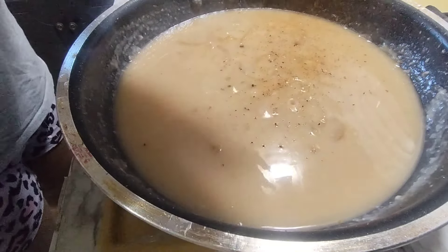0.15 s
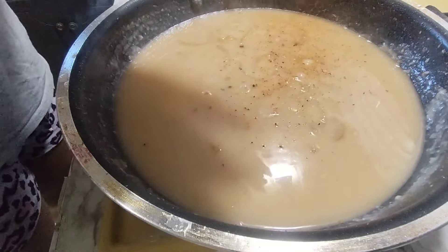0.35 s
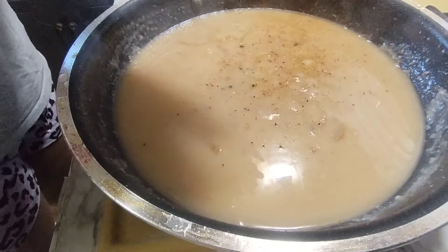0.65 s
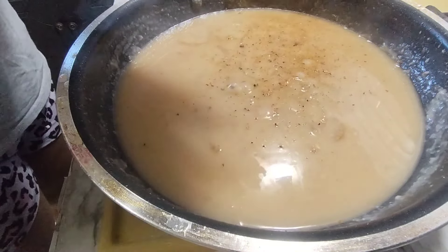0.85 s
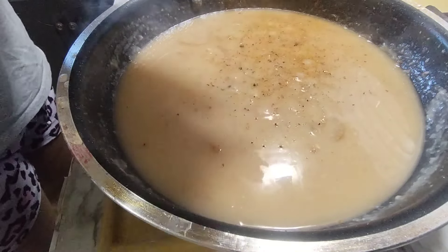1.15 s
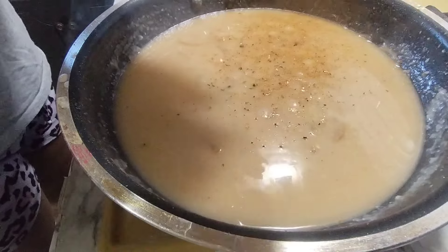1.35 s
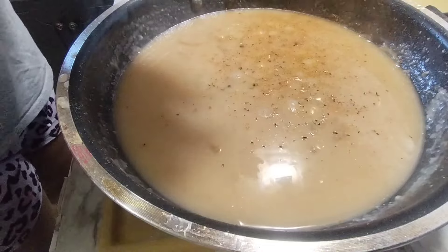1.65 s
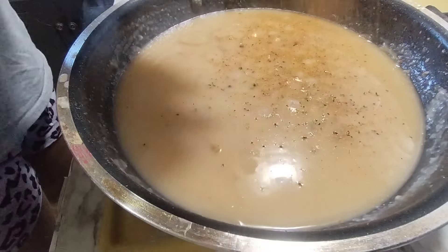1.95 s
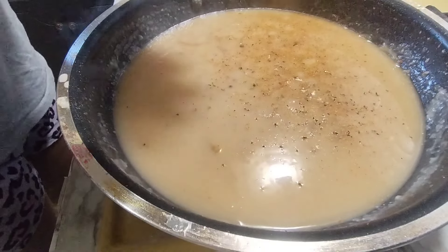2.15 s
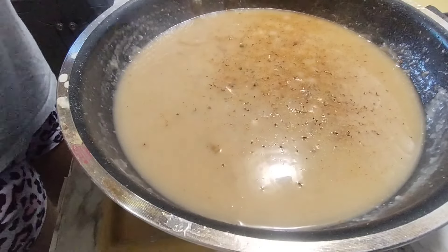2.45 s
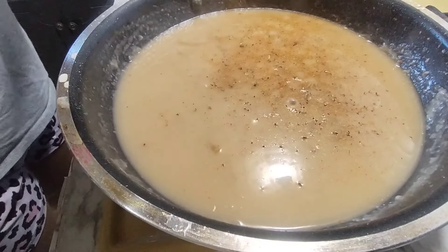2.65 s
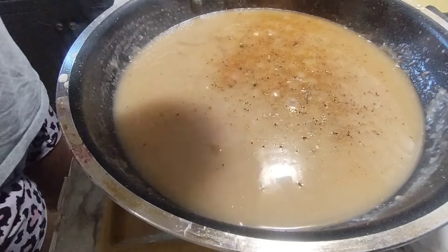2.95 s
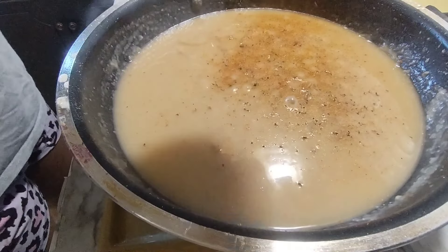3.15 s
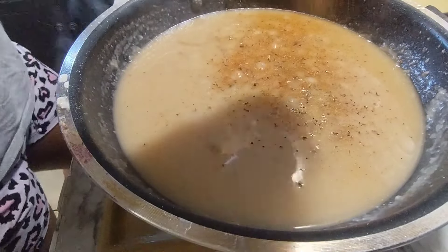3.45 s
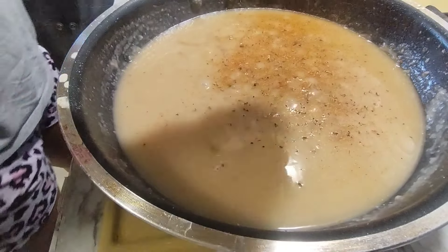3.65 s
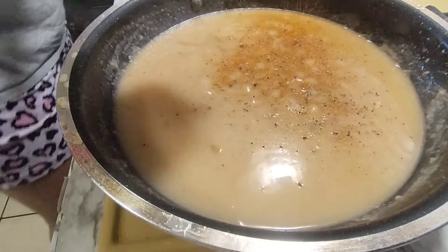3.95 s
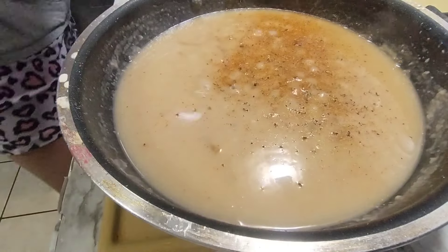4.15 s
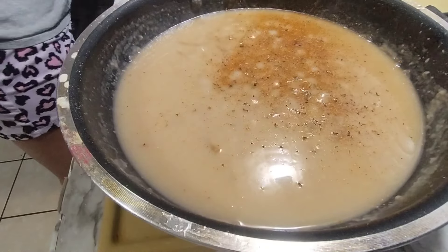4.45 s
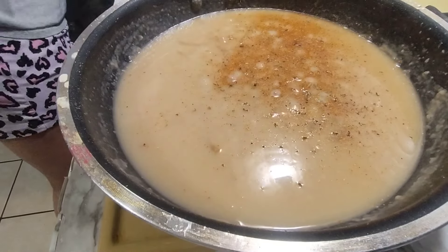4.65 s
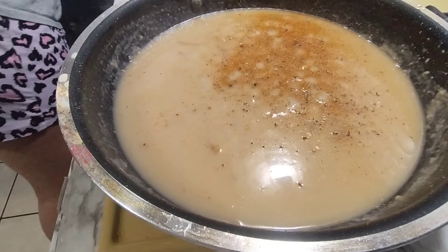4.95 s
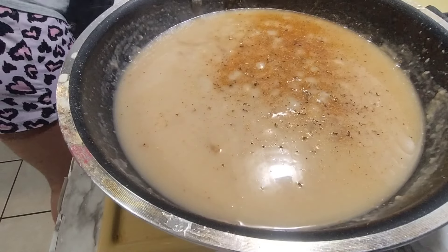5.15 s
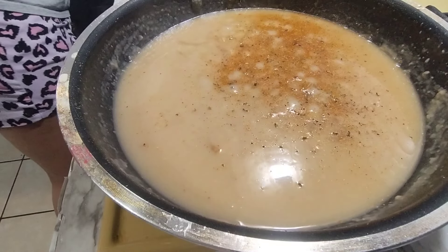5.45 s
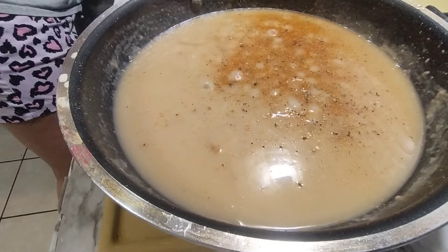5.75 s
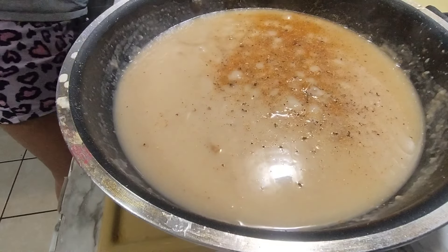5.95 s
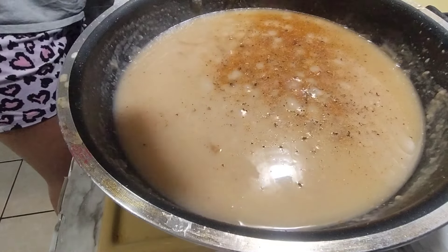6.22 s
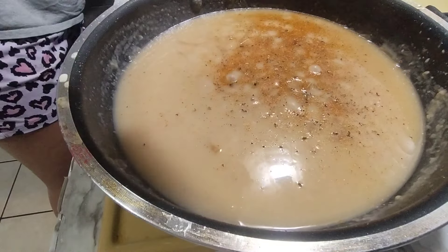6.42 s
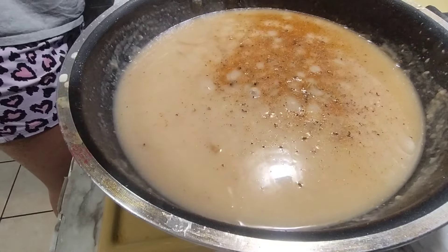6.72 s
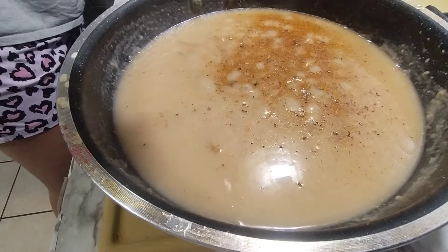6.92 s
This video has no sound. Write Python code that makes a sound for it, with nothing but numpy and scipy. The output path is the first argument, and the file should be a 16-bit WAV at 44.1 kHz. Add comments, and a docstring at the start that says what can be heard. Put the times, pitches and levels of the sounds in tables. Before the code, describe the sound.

A quiet kitchen with a faint low fridge hum and soft room noise, heard close in stereo, the left side brighter. From 0 to about 3.7 seconds a spice shaker is shaken steadily, nearly five strokes a second: dry, bright grains swish up, slap the cap in a crisp burst, then pour back. Strokes are strongest around 1.4 to 2 seconds, and the slaps weaken after 3.2. Little clicks stray among them. Grains trickle softly from 3.8 to 4.3. At 4.35 the bottle hits the worktop with a loud, hard, short-ringing knock, with a weaker rocking tap at 4.44. Around 5.0 to 5.2 there are small scuffs and soft bumps; a stronger low, dull shudder comes at 5.35, another at 5.8, fainter ones near 6.1. Tiny cap ticks scatter throughout, clustering at 6.6 to 6.7. Grains rustle faintly at 6.4, then a brief bright rattle at 6.95 as another shaker is lifted.

```python
"""Spice shaker in a hard kitchen

Shaker strokes: grain noise swells as the grains slide, bursts as they slam into the cap, then pours back.
Later the bottle is knocked down on the worktop (noise cracks, ringing modes), the stand is bumped (sines,
grit), something scuffs (banded grit), caps tick (noise bursts) and another shaker is lifted. A fridge hums
(sines, narrow noise) under coloured room noise. The two microphone ports differ, the left one bright."""
import sys
import numpy as np
from scipy import signal
from scipy.fft import rfft, irfft
from scipy.io import wavfile
from scipy.ndimage import uniform_filter1d

SR = 44100
rng = np.random.default_rng(int(sys.argv[2]) if len(sys.argv) > 2 else 0)


def digitize_waveform(pressure):
    """Quantize a signal to 16-bit integers and store it at the path in sys.argv[1].

    Rows of a 2-D input are taken as channels; values are limited to [-1, 1].
    """
    field = np.atleast_2d(pressure).T
    bounded = np.clip(field, -1, 1)
    quanta = np.round(bounded * 32767).astype(np.int16)
    wavfile.write(sys.argv[1], SR, quanta)


N = 312228
T = np.arange(N) / SR   # s
TICK_LEAN_DB = 4   # left over right, small sounds
# correlation of diffuse sound at the two ports: [hz, likeness_0_to_1]
PORT_LIKENESS = [(60, 1), (230, 0.6), (920, 0.11), (3600, 0.02), (14100, 0.11)]


def from_db(db):
    """Decibels to gain."""
    return 10 ** (np.asarray(db) / 20)


def rms_one(x):
    """Scale the mean of the channels to rms 1."""
    mono = np.mean(np.atleast_2d(x), axis=0)
    return x / np.sqrt(np.mean(mono ** 2) + 1e-20)


def filtered(x, order, hz, kind="low"):
    """Butterworth filter."""
    return signal.sosfilt(signal.butter(order, hz, kind, fs=SR, output="sos"), x)


def lean(db):
    """Gains that set left over right by db."""
    return from_db([[db / 2], [-db / 2]])


def at_hz(points, hz):
    """Read a table on a log-frequency axis."""
    table_hz, values = np.transpose(points)
    return np.interp(np.log(hz), np.log(table_hz), values)


def colour(pair, spectra):
    """Give each port its own spectrum from rows (hz, left_db, right_db), then set the level to rms 1."""
    table_hz, *ports_db = np.transpose(spectra)
    log_hz = np.log(np.maximum(np.fft.rfftfreq(N, 1 / SR), 1))
    gains = from_db([np.interp(log_hz, np.log(table_hz), db) for db in ports_db])
    return rms_one(irfft(rfft(pair) * gains, N))


def stereo_noise():
    """White noise whose mid and side parts are weighted for the likeness of the ports at each frequency."""
    mid, side = rfft(rng.standard_normal((2, N)))
    hz = np.maximum(np.fft.rfftfreq(N, 1 / SR), 1)
    alike = np.clip(at_hz(PORT_LIKENESS, hz), -1, 1)
    return irfft(np.sqrt(1 + alike) * mid + np.sqrt(1 - alike) * side * [[1], [-1]], N)


def ring(clicks, hz, t60):
    """Two-pole resonator: a unit click sets a sine of about height 1 ringing."""
    radius = from_db(-60 / (t60 * SR))
    w = 2 * np.pi * hz / SR
    return signal.lfilter([0, np.sin(w)], [1, -2 * radius * np.cos(w), radius ** 2], clicks + 1e-18)


def grains(per_s, spread_db):
    """Tiny random collisions of uneven size, other ones at each port."""
    sizes = from_db(spread_db * np.minimum(rng.exponential(1, (2, N)), 5))
    signs = rng.choice([-1, 1], (2, N))
    return sizes * signs * (rng.random((2, N)) < per_s / SR)


def background():
    """Coloured room noise, and fridge hum lines as steady sines plus wavering narrow-band noise."""
    # room noise, left against right: [hz, left_over_right_db]
    air_lean = [(60, 0.5), (160, 0), (300, 2.5), (600, 4), (5400, -4), (7400, 6), (10000, 11), (14100, -18)]
    # room noise spectrum, relative: [hz, level_db_per_hz]
    air = [(25, -20), (108, 1.5), (166, -14.5), (234, 4), (290, -8), (331, -3.5), (432, -8), (534, -12),
           (800, -15.5), (2000, -16.5), (7000, -18.5), (9000, -18.5), (11000, -25.5), (14500, -38)]
    # fridge hum: [centre_hz, width_at_half_amplitude_hz, wavering_db, steady_db, left_over_right_db]
    hum = [(121, 1.5, -80.5, -76, -3), (214.7, 15, -81.5, -105, 10), (242.4, 5.9, -77, -90, 5.5),
           (335.4, 6.1, -89, -77.5, 11.5), (434.7, 57, -75, -100, -1)]
    air_db = -68
    leaning = colour(stereo_noise(), [(f, db / 2, -db / 2) for f, db in air_lean])
    out = from_db(air_db) * colour(leaning, [(f, db, db) for f, db in air])
    hz = np.fft.rfftfreq(N, 1 / SR)
    for centre_hz, width_hz, wavering_db, steady_db, lean_db in hum:
        resonance = 1 / (1 + ((hz - centre_hz) / width_hz * 2) ** 2)
        wavering = rms_one(irfft(rfft(rng.standard_normal(N)) * resonance, N))
        steady = np.sqrt(2) * np.sin(2 * np.pi * centre_hz * T)
        out = out + (from_db(wavering_db) * wavering + from_db(steady_db) * steady) * lean(lean_db)
    return out


def patchy(x, depth_db):
    """Split into bands whose levels wander separately, as grains bunch and scatter."""
    step = 20   # samples between points of the slow gain
    bands = 8   # 2/3 octave apart from 500 Hz
    hz, spectrum, out = np.fft.rfftfreq(N, 1 / SR), rfft(x), 0
    place = 1.5 * np.log2(np.clip(hz, 500, 12700) / 500)
    wander_band = signal.butter(2, [8, 70], "band", fs=SR / step, output="sos")
    wander = signal.sosfilt(wander_band, rng.standard_normal((bands, N // step + 1)))
    for k, slow in enumerate(wander):
        slow = np.interp(np.arange(N) / step, np.arange(len(slow)), rms_one(slow))
        band = irfft(spectrum * np.maximum(1 - abs(place - k), 0), N)
        out = out + from_db(depth_db * slow) * band
    return rms_one(out)


def shaker():
    """Sliding grains swell before each slam and pour back after it; the slam is a short dense burst."""
    # strokes: [slam_s, slam_db, slam_length_s, slide_db, swell_from_6_db_down_s, peak_ahead_of_slam_s,
    #           sag_after_peak_db_per_s, pour_back_db, pour_lasts_s, pour_fade_db_per_s]
    strokes = [(0.115, -45, 0.014, -52, .027, 0.03, 5, -55, 0.04, 140),
               (0.324, -51, 0.014, -53.5, 0.026, .038, 50, -54.5, .1, 44),
               (0.55, -44.5, .0095, -51.5, 0.022, 0.047, 36, -51, 0.082, 82),
               (0.775, -47.5, 0.0099, -53, 0.023, 0.049, 10, -51.5, .072, 77),
               (0.997, -47, 0.0094, -53, 0.018, 0.044, 10, -51, 0.07, 10),
               (1.208, -45, 0.0056, -50.5, 0.029, .034, 120, -46, 0.073, 128),
               (1.405, -39.5, 0.01, -48.5, 0.022, 0.046, 67, -48, 0.074, 36),
               (1.598, -42.5, 0.0095, -48, 0.023, 0.042, 33, -43.5, .072, 130),
               (1.786, -43.5, 0.019, -49.5, 0.025, 0.042, 40, -44, 0.059, 133),
               (1.977, -42, 0.011, -48.5, 0.031, 0.041, 180, -46.5, 0.059, 60),
               (2.181, -43.5, 0.018, -51, 0.023, 0.045, 10, -47, 0.079, 75),
               (2.406, -43.5, 0.0064, -49.5, 0.022, 0.053, 70, -45, 0.082, 78),
               (2.625, -45, 0.013, -49.5, 0.017, 0.051, 66, -49.5, 0.081, 17),
               (2.849, -46, 0.01, -50, 0.028, 0.043, 180, -50.5, 0.079, -1),
               (3.06, -47, 0.0092, -52.5, 0.028, 0.031, 120, -50, 0.07, 66),
               (3.278, -54, 0.0035, -50.5, 0.028, 0.033, 64, -46.5, 0.058, 127),
               (3.49, -56, .014, -49, 0.024, 0.042, 120, -46, 0.078, 123),
               (3.694, -57.5, 0.025, -57.5, .027, 0.036, 100, -50.5, 0.048, 130),
               (6.939, -58, 0.017, -60, 0.017, 0.053, 50, -52, 0.09, 34)]
    # grains tip over in a tilted shaker: [middle_s, level_db, half_length_to_6_db_down_s, dullness_db]
    tips = [(3.863, -62.5, 0.038, 5), (3.966, -56, 0.065, 0.5), (4.076, -59.5, 0.065, 9.5),
            (4.26, -59.5, 0.013, 4), (4.34, -63.5, 0.14, 8.5), (5.01, -67.5, 0.031, 10.5),
            (5.22, -66.5, 0.13, 6.5), (6.396, -60.5, 0.096, 4), (6.748, -62, 0.036, 2),
            (6.884, -62, 0.029, -7), (6.976, -47.5, 0.031, -5)]
    # sliding grains at each port, relative: [hz, left_db_per_hz, right_db_per_hz]
    slide_colour = [(300, -49, -41), (570, -20.5, -20), (1780, -19.5, -21.5), (2150, -16, -15.5),
                    (2710, -16.5, -17.5), (4600, -14.5, -14.5), (5700, -12.5, -12.5), (7140, -10, -12.5),
                    (8200, -1, -20), (9130, 1, -16), (10470, -5.5, -23), (11700, -10, -23),
                    (15600, -19, -23.5)]
    # slamming grains at each port, relative: [hz, left_db_per_hz, right_db_per_hz]
    slam_colour = [(100, -15, -15), (550, -17.5, -31), (1190, -23.5, -13), (2280, -12, -23),
                   (4260, -19, -12.5), (5400, -14, -14), (6880, -2, -6.5), (8100, 2, -14), (9500, 2.5, -12),
                   (10060, -0.5, -27), (11500, -8.5, -15), (15200, -19, -29)]
    # rustle between the regular strokes, then a faint one
    steady_shaking_ends_s, between_db, at_rest_db = 3.76, -64, -81
    slam_fall_db_per_s = 1048
    pour_fall_s = 0.013   # the pour loses a further 6 dB this long after it ends
    body_follows, full_flow_db = 0.57, -49   # lower rustle swings less than the bright, around full flow
    slam_lag_s, slam_blur_s = 0.002, 0.0045   # the far port hears the slam later and less sharply

    shaking = T < steady_shaking_ends_s
    slide_power = from_db(2 * np.where(shaking, between_db, at_rest_db))
    slam = np.zeros(N)
    for at, slam_db, length, slide_db, swell_s, lead, sag, back_db, lasts, fade in strokes:
        near = slice(max(round((at - .25) * SR), 0), round((at + .3) * SR))
        t = T[near] - at
        rise = np.clip(t / 0.0052 + .5, 0, 1)   # crossover from slide to pour
        swell = 6 * (np.maximum(-lead - t, 0) / swell_s) ** 2
        before_db = slide_db - swell - sag * np.maximum(t + lead, 0)
        after_db = back_db - fade * t - 6 * (np.maximum(t - lasts, 0) / pour_fall_s) ** 2
        slide_power[near] += (1 - rise ** 2) * from_db(2 * before_db)
        slide_power[near] += rise ** 2 * from_db(2 * after_db)
        slam[near] += rise ** 2 * from_db(slam_db - slam_fall_db_per_s * np.maximum(t - length, 0))

    compressed = slide_power ** body_follows * from_db(2 * full_flow_db * (1 - body_follows))
    body_power = np.where(shaking, compressed, slide_power)
    for at, db, half, dull_db in tips:
        near = slice(round((at - .4) * SR), round((at + .4) * SR))
        swell = from_db(2 * (db - 6 * ((T[near] - at) / half) ** 2))
        slide_power[near] += swell
        body_power[near] += swell * from_db(2 * dull_db)

    rustle = patchy(colour(grains(per_s=8000, spread_db=1.6), slide_colour), depth_db=1.65)
    body = filtered(rustle, 2, 5500)
    sliding = np.sqrt(slide_power) * (rustle - body) + np.sqrt(body_power) * body
    blurred = uniform_filter1d(slam, max(round(slam_blur_s * SR), 1))
    far = np.interp(T - slam_lag_s, T, blurred)
    burst = colour(grains(per_s=17000, spread_db=1.0), slam_colour)
    return sliding + np.array([slam, far]) * burst


def strays():
    """Sparse clicks of single loose grains, each ringing a few cycles at its own pitch, at both ports."""
    per_s, level_db = 82, -81.5
    clicks = grains(per_s=per_s, spread_db=3.0)[0]
    pitches_hz = np.geomspace(3200, 9000, 8)
    dealt = rng.integers(0, len(pitches_hz), N)
    rings = sum(ring(clicks * (dealt == k), hz, 11.0 / hz) for k, hz in enumerate(pitches_hz))
    return from_db(level_db) * rms_one(rings) * lean(TICK_LEAN_DB)


def kitchen(x):
    """Reflections: noise that dies band by band, unlike at the two ports except in the bass."""
    # reverberation time: [hz, t60_s]
    decay = [(100, 0.49), (600, 0.46), (3000, 0.41), (9000, 0.18), (14000, 0.26)]
    t = np.arange(SR * 3 // 4) / SR
    white = rng.standard_normal((2, 2, len(t)))   # neighbouring bands get unrelated noise
    tail = 0
    for k, low_hz in enumerate(45 * 2 ** np.arange(0, 8.5, .5)):
        band = filtered(white[k % 2], 1, [low_hz, np.sqrt(2) * low_hz], "band")
        alike = np.clip(at_hz(PORT_LIKENESS, low_hz), 0, 1)
        band[1] = alike * band[0] + np.sqrt(1 - alike ** 2) * band[1]
        tail = tail + band * from_db(-60 * t / at_hz(decay, low_hz))
    tail = tail * (1 - np.exp(-t / 0.0032))   # soft onset
    tail = tail / np.sqrt(np.sum(tail ** 2) / 2)
    return signal.fftconvolve(x * np.ones((2, 1)), tail, axes=1)[:, :N]


def ticks():
    """Caps, fingers and lumps of spice: each tick is a dying burst of noise around its pitch."""
    # ticks: [start_s, level_db, pitch_hz]
    tick_list = [(0.449, -52.5, 6030), (1.116, -62, 6000), (2.539, -57, 6200), (2.566, -51, 6350),
                 (2.742, -56, 5400), (2.9132, -47, 8440), (3.5644, -52, 8800), (3.815, -44, 10700),
                 (4.039, -54, 8660), (4.661, -60, 5400), (4.745, -55.5, 8750), (4.801, -55.5, 8500),
                 (4.957, -61.5, 4600), (4.989, -56.5, 7800), (5.3867, -58.5, 7000), (5.5455, -55, 8200),
                 (5.628, -66, 6000), (5.7665, -51, 8600), (5.86, -59, 8020), (5.9745, -62, 7000),
                 (6.0444, -64, 7000), (6.168, -60, 6880), (6.2118, -53.5, 7140), (6.597, -49, 6760),
                 (6.657, -53, 7600), (6.7153, -62, 6200), (6.727, -52, 7100)]
    fall_db_per_s, snap_per_db, soft_db = 2600, 200, -50.5   # ticks harder than a soft one die faster
    out, t = np.zeros((2, N)), np.arange(SR // 20) / SR
    for at, db, hz in tick_list:
        noise = rng.standard_normal((2, len(t)))
        band = rms_one(filtered(noise, 2, [hz / 1.6, hz * 1.2], "band"))
        fall = fall_db_per_s + snap_per_db * max(db - soft_db, 0)
        i = round(at * SR)
        out[:, i:i + len(t)] += band * from_db(db - fall * t) * lean(TICK_LEAN_DB)
    return out


def knocks():
    """Hard contact: a crack of noise some ms long, and modes that reach the ports with unlike signs."""
    # bottle lands on the worktop and rocks to rest: [start_s, crack_db, ring_over_crack_db, treble_tilt_db]
    landings = [(4.3546, -23, -9.5, 1), (4.361, -32.5, -19, -5), (4.44, -43, -24, 1)]
    # modes of bottle and worktop, relative: [hz, level_db, t60_s]
    modes = [(124, -12, 0.13), (230, -12.5, .1), (389, -7, 0.14), (489, -11, 0.12), (522, -9, 0.12),
             (583, -3.5, 0.13), (606, -2, 0.17), (700, -6, 0.12), (960, -11, 0.045), (1170, 1.5, 0.051),
             (2265, 8.5, 0.029), (2800, -2, 0.017), (3530, -4, 0.023), (4200, -7, 0.019)]
    # crack at each port, relative: [hz, left_db_per_hz, right_db_per_hz]
    crack_colour = [(201, -16, -15), (400, 6, 1), (614, 7.5, 5.5), (1590, -7, -5), (2840, 0, -2),
                    (5200, -8, -6), (7160, -9, -11), (9000, -6, -35), (12200, -33, -40)]
    start_s, crack_db, ring_db, tilt_db = np.transpose(landings)
    at = np.round(start_s * SR).astype(int)
    rings, crack = np.zeros((2, N)), np.zeros((2, N))
    for k, (hz, db, t60) in enumerate(modes):
        clicks = np.zeros(N)
        clicks[at] = from_db(crack_db + ring_db + db)
        right_sign = 1 if hz < 600 or k % 3 else -1
        rings += ring(clicks, hz, t60) * (-1) ** k * np.array([[1], [right_sign]])
    noise = colour(stereo_noise(), crack_colour)
    dull = filtered(noise, 2, 2500)
    t = np.arange(SR // 10) / SR
    envelope = from_db(-60 * t / 0.036) * np.minimum(t / 0.0016, 1) ** 2
    for i, db, tilt in zip(at, crack_db, tilt_db):
        here = slice(i, i + len(t))
        burst = dull[:, here] + from_db(tilt) * (noise - dull)[:, here]
        crack[:, here] += from_db(db) * envelope * burst
    return crack, rings


def bumps():
    """The stand is bumped: short low shudders, quick to swell, with thud, grit and handling rumble."""
    # handling rumble, level before the mix: [time_s, level_db]
    handling = [(4.942, -72), (5.232, -65), (5.382, -64.5), (6.11, -72.5), (6.399, -74.5)]
    # soft bumps, levels before the mix: [start_s, shudder_db, length_s, shudder_hz, thud_db,
    #                                     grit_over_shudder_db]
    nudges = [(5.004, -55.5, 0.036, 223, -66, -12), (5.062, -57, 0.055, 214, -59, -11),
              (5.165, -44.5, 0.014, 241, -43, -14), (5.195, -48, 0.014, 230, -48, -20),
              (5.343, -29.5, 0.031, 236, -47, -15), (5.373, -35.5, 0.0097, 345, -45, -25),
              (5.396, -46, 0.019, 244, -54, -19), (5.417, -42.5, 0.022, 253, -64, -19),
              (5.793, -36.5, 0.026, 235, -50, -25), (5.806, -44, 0.026, 200, -39.5, -21),
              (6.053, -51, 0.026, 224, -52, -22), (6.099, -51.5, 0.025, 244, -55, -17)]
    # upper modes of a bump, relative: [hz, level_db, t60_s]
    upper_modes = [(469, 2, 0.051), (680, -4, 0.027), (953, -2.5, .035)]
    swell_skew, grit_fall_db = 0.63, 16   # swells faster than it fades
    thud_hz, thud_s = 104.4, 0.025
    tap_db = 4   # how hard the upper modes ring, over the grit
    low, grit = rng.standard_normal((2, N))
    grit = rms_one(filtered(grit, 5, [280, 950], "band"))
    rumble = rms_one(filtered(low, 2, [50, 420], "band"))
    rumble = rumble + from_db(-2) * rms_one(ring(low, hz=242.0, t60=0.15))   # a resonance hums along
    time_s, rumble_db = np.transpose(handling)
    out = rumble * from_db(np.interp(T, time_s, rumble_db, -120, -120))
    taps = np.zeros(N)
    for at, shudder_db, length, hz, thud_db, grit_db in nudges:
        i, t = round(at * SR), np.arange(round(length * SR)) / SR
        here = slice(i, i + len(t))
        taps[i] = from_db(shudder_db + grit_db + tap_db)
        swell = np.sin(np.pi * (t / length) ** swell_skew)
        out[here] += swell * from_db(shudder_db) * np.sin(2 * np.pi * hz * t)
        grit_gain = from_db(shudder_db + grit_db - grit_fall_db * t / length)
        out[here] += grit_gain * np.sqrt(swell) * grit[here]
        t = np.arange(round(thud_s * SR)) / SR
        thud = np.sin(np.pi * t / t[-1]) ** 2 * np.sin(2 * np.pi * thud_hz * t)
        out[i:i + len(t)] += from_db(thud_db) * thud
    taps = filtered(taps + 1e-18, 4, 1250)   # a soft contact
    return out + sum(from_db(db) * ring(taps, hz, t60) for hz, db, t60 in upper_modes)


def scuffs():
    """A short rough drag: dense grit in a band, quick to start and dying out."""
    # scuffs: [start_s, level_db, time_to_fall_12_db_s, low_hz, high_hz]
    drags = [(4.97, -50.5, 0.0086, 636, 1470), (5.164, -54, 0.0073, 900, 1790),
             (5.18, -48.5, 0.01, 550, 2290), (5.791, -65, .045, 1000, 2480)]
    out, grit = np.zeros((2, N)), grains(per_s=15000, spread_db=0.0)
    grit[1] += grit[0]
    for at, db, length, low_hz, high_hz in drags:
        i, t = round(at * SR), np.arange(round(2 * length * SR)) / SR
        here = slice(i, i + len(t))
        band = rms_one(filtered(grit[:, here], 3, [low_hz, high_hz], "band"))
        out[:, here] += band * np.minimum(t / .0015, 1) * from_db(db - 12 * t / length)
    return out


def scene():
    """All sources, each with its own share of the kitchen's reflections."""
    spice, soft = shaker(), bumps()
    crack, rings = knocks()
    small = ticks() + strays() + scuffs()
    sent = from_db(-5.0) * crack + from_db(-7.5) * small
    sent = sent + from_db(-10) * spice + from_db(-16) * soft + from_db(-14) * rings
    soft_pair = soft * from_db([[-.8], [.8]])
    return spice + crack + rings + soft_pair + small + kitchen(sent) + background()


def record(dry):
    """The microphone drops the deep bass; the top is cut steeply."""
    cutoff_hz = 14330
    dry = filtered(dry, 2, 40, "high")
    return signal.sosfilt(signal.ellip(14, .3, 100, cutoff_hz, fs=SR, output="sos"), dry)


dry = scene()
out = record(dry)
digitize_waveform(out)
```